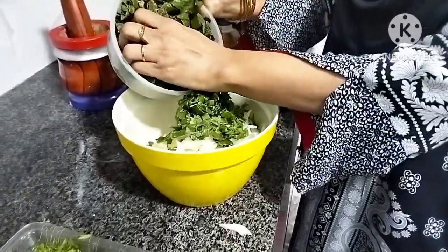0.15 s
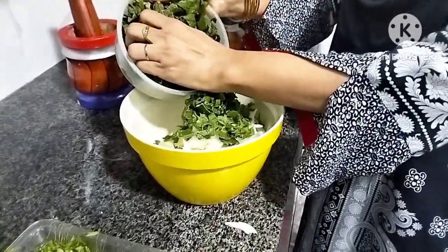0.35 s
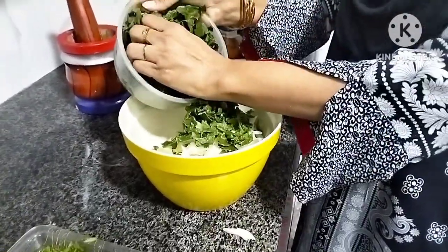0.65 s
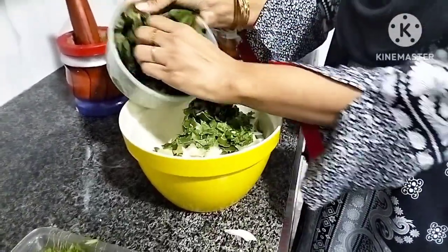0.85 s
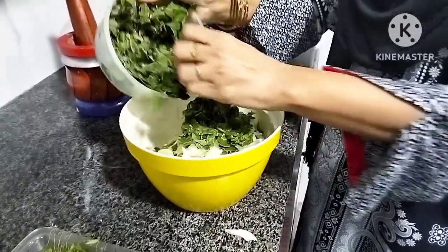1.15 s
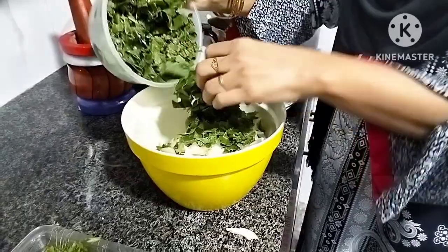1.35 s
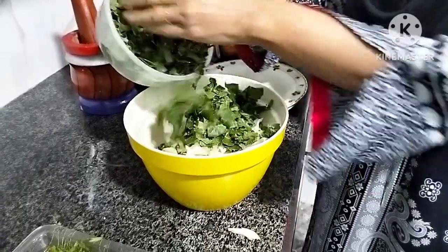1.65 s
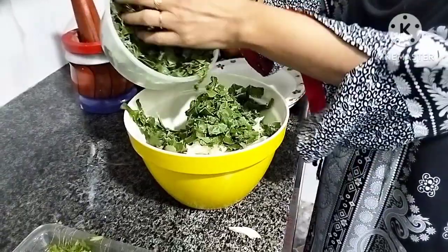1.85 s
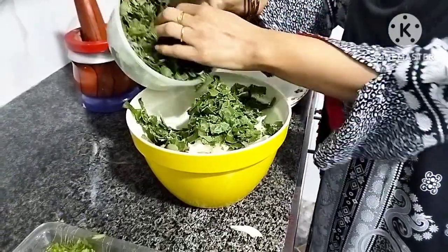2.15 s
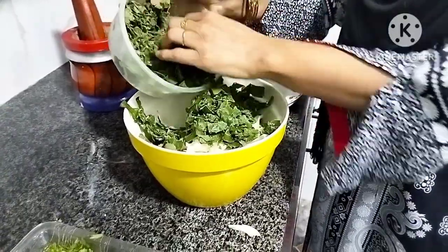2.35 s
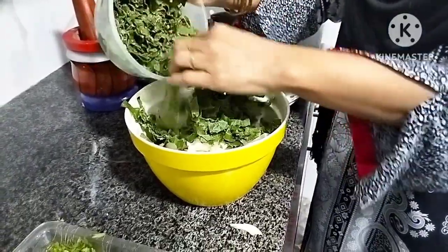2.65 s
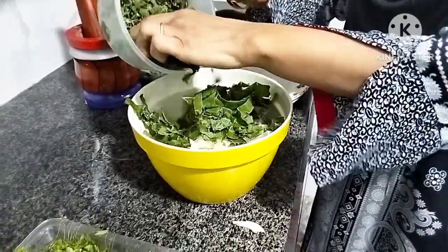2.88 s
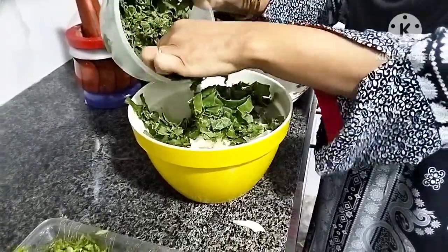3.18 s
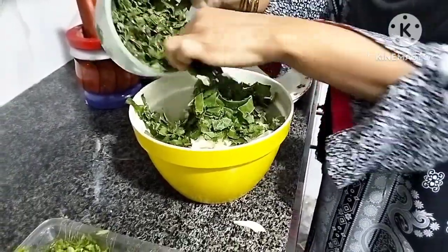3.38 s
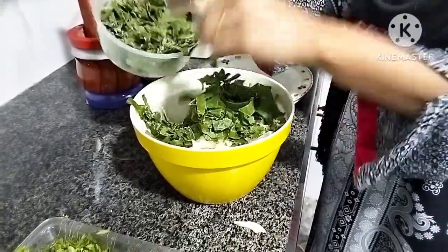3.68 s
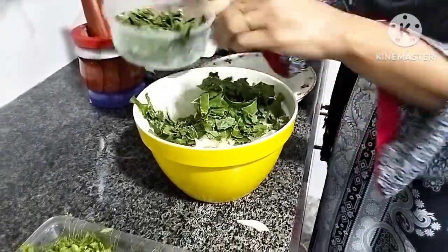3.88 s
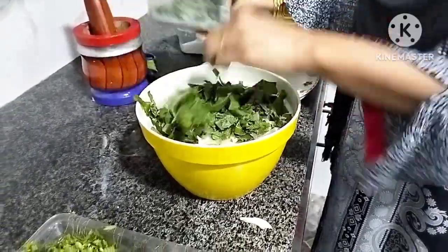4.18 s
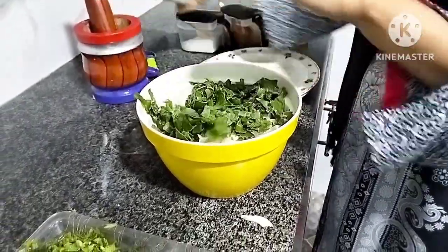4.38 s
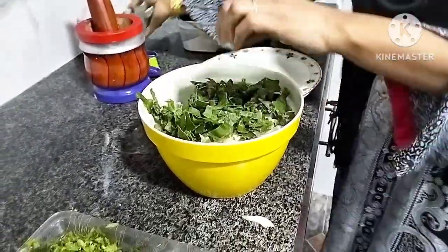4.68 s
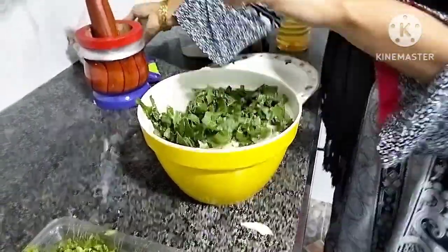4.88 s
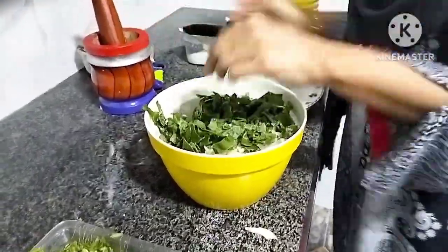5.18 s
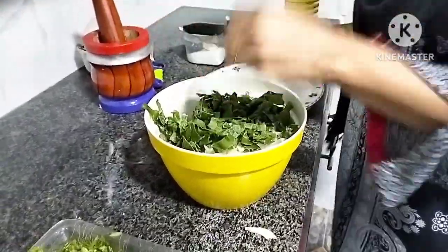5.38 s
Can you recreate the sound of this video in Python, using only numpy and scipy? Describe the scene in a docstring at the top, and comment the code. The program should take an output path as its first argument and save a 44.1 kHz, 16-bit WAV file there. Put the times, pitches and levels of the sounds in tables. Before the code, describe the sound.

A close stereo pickup in a small, reverberant kitchen with a quiet steady room bed. From 0 s, frozen leaves rustle and crackle as fingers rake them from a plastic tub, with dull, hollow bumps at about 0.3-0.7 s, the hardest near 0.68, and more around 1.0-1.3. Bangles give a short clink at 0.8 and a small damped cluster from 1.6 to 1.9. Rustling surges, crisp and bright, at 2.1-2.3 with light tub taps, then continues in strokes at 2.5 and 3.0-3.3 with icy snaps near 2.7-2.9 and a crunch at 3.1. It thins to faint crackles by 3.9. A sleeve brushes softly and unevenly from 4.1 to 5.0, with a barely audible high metallic shimmer near 4.8. The empty tub then hits stone at 4.9, rocks at 4.98 and lands at 5.06-5.1: loud, hollow, clattering knocks. Their ring decays to the end at about 5.7, with another tiny shimmer near 5.3.

```python
"""Raking frozen spinach from a tub

Frozen leaves are raked by hand out of a plastic tub in a hard-walled kitchen: fracture noise follows the strokes.
Clumps crunch as noise bursts; bumps excite the resonances of the leaf-filled tub, and bangles clink as damped metal.
A sleeve brushes past, thin bangles shimmer faintly, and the empty tub is set down on stone in a few quick knocks.
Room decay surrounds the handling and the knocks, over a quiet bed of shaped noise."""
import sys
import numpy as np
from scipy import signal
from scipy.fft import rfft, irfft, next_fast_len
from scipy.io import wavfile
from scipy.ndimage import uniform_filter1d, map_coordinates

SR = 44100
rng = np.random.default_rng(int(sys.argv[2]) if len(sys.argv) > 2 else 0)


def output_pcm(signal):
    """Save a mono or channel-first signal as 16-bit PCM at the path in sys.argv[1].

    Samples are clipped to [-1, 1] before scaling.
    """
    pcm = np.clip(np.atleast_2d(signal).T, -1, 1) * 32767
    wavfile.write(sys.argv[1], SR, np.round(pcm).astype(np.int16))


N = 243766

# fingers and clumps bumping the tub: (time [s], level [dB], hardness as relative tap level [dB])
TUB_BUMPS = [(0.336, -23, -5.5), (0.444, -17.5, -5.5), (0.5, -20, -1.5), (0.675, -10, -2.5),
             (0.712, -19, 0), (0.974, -12, -18), (1.24, -18, -16.5), (1.317, -24.5, -17),
             (1.639, -44, 14.5), (1.686, -44.5, 13.5), (1.878, -38, -12), (2.092, -24, 4.5),
             (2.191, -20, 2.5), (2.235, -19, -7), (3.002, -25.5, -2), (3.27, -34.5, 9.5), (3.318, -30, 7.5),
             (3.723, -45.5, 9), (3.799, -52.5, 15)]
# resonances of the tub damped by leaves: (frequency [Hz], width [Hz], level [dB])
LEAFY_TUB_MODES = [(164.3, 39, -10), (242, 160, -9), (341, 55, -1), (541, 47, 4), (762, 62, -2.5)]
# colour of the frozen leaves: (frequency [Hz], level [dB per Hz])
LEAF_COLOUR = [(410, -56), (700, -39), (808, -10), (922, -33), (1400, -16), (1710, -13.5), (2270, -5.5),
               (2590, -8), (5470, -10), (8210, -22.5), (14000, -17), (15200, -21), (16000, -40)]


def raking():
    """Leaves crackle against each other, catch on the wall of the tub and make its base boom."""
    # resonances of the wall: (frequency [Hz], width [Hz], level [dB])
    wall_modes = [(798, 55, 6), (1030, 110, 0.5), (1380, 330, -1.5)]
    rustle, crisp, scraping, pressing = efforts()

    ticks = amp(-3) * fractures(rate=140, size_db=3, length=0.0009)
    grain = unit(crackle(rate=1300, size_db=-3.5, life=0.0039) + ticks)
    leaves = coloured(grain, LEAF_COLOUR) * amp(wobble(45))
    # the top, split off above 7.5 kHz, follows its own crispness
    top = filtered(leaves, lambda hz: 1 / (1 + (7500 / (hz + 1)) ** 8))

    wall_grain = crackle(rate=390, size_db=-2.5, life=0.0017)
    wall = amp(-4) * unit(resonant(wall_grain, wall_modes))
    base_grain = crackle(rate=400, size_db=-0.5, life=0.0011)
    base = amp(-6.5) * unit(resonant(base_grain, LEAFY_TUB_MODES))

    iciness = amp(1.5 * wobble(20))
    catching = amp(3 * wobble(30))
    bright = crisp * iciness * top * amp(1.5)
    return rustle * (leaves - top) + bright + scraping * catching * wall + pressing * base


def efforts():
    """How strongly the strokes drive rustle, crispness, wall and base; overlapping strokes add in power."""
    # the hand strokes and shakes the leaves: (time of greatest effort [s], rustle level [dB], swell [s],
    # release [s], then relative to the rustle: crispness [dB], scraping the wall [dB], pressing on the base [dB])
    strokes = [(0.019, -38.5, 0.85, 0.26, 0, 0.5, 0.5), (0.17, -39, 0.18, 0.36, 3, -2.5, -4.5),
               (0.52, -40.5, 0.2, 0.76, -0.5, 4, -1.5), (0.69, -34, 0.089, 0.15, 4.5, -14, 4),
               (0.93, -34, 0.093, 0.28, 1, -2, -24), (1.018, -33.5, 0.18, 0.13, -11, -9, -1),
               (1.17, -39.5, 0.18, 0.3, -17, -9, -1.5), (1.30, -40, 0.23, 0.29, -1, -8.5, -2),
               (1.5, -47, 0.37, 0.26, 6, -28, -18), (1.69, -41, 0.18, .3, -1, -17, -34),
               (1.87, -43, 0.24, 0.18, 6, -4, -6), (2.089, -31, .3, 0.1, 1.5, 1, -8),
               (2.238, -27.5, 0.13, 0.15, 1.5, 1, -7), (2.51, -32.5, 0.38, 0.19, -2, 3, -4.5),
               (2.70, -42, 0.074, 0.56, -3.5, -13, -11.5), (3.008, -30, .07, 0.23, -2.5, -5.5, -12),
               (3.124, -33, 0.13, 0.046, -7, 3.5, -7), (3.288, -35, 0.49, 0.35, 0.5, -1.5, -10.5),
               (3.84, -48, 0.29, 0.26, 1.5, -33, -15.5), (4.2, -53, 0.084, 0.25, 9.5, -23, -18)]
    power = 0
    for s, db, rise, fall, *shares in strokes:
        levels = amp(db + np.array([0, *shares]))
        power = power + np.outer(levels, swell(s, rise, fall)) ** 2
    return np.sqrt(power)


def swell(s, rise, fall):
    """A gain that climbs 20 dB in rise seconds to a rounded peak at s and sinks 20 dB in fall seconds."""
    t = np.arange(N) / SR - s
    roundness = 1.11
    return amp(-20 * np.maximum(-t / rise, t / fall) ** roundness)


def crackle(rate, size_db, life):
    """Noise made of tiny fractures, rate a second, of random size; the energy of each fades over life seconds."""
    chance = rng.random(N)
    size = np.minimum(rng.exponential(size=N), 5)
    hits = (chance < rate / SR) * amp(size_db * size) ** 2
    energy = signal.lfilter([1], [1, -np.exp(-1 / (life * SR))], hits)
    return unit(np.sqrt(energy) * noise(N))


def fractures(rate, size_db, length):
    """Single stiff leaves snapping: dry ticks, rate a second, a few much larger than the rest."""
    struck = rng.random(N) < rate / SR
    sizes = struck * amp(size_db * np.minimum(rng.exponential(size=N), 3.5))
    envelope = signal.lfilter([1], [1, -np.exp(-1 / (length * SR))], sizes)
    return unit(envelope * noise(N))


def crunches():
    """A clump, squeezed or jolted by a bump, gives way in a burst of noise, the iciest with a bright snap."""
    # clumps of stiff leaves breaking between the fingers: (time [s], level [dB], relative top-octave snap [dB])
    squeezes = [(0.0922, -24, -10), (0.2205, -26.5, -18), (0.825, -27.5, -21), (1.1533, -24, -26),
                (1.8555, -29.5, 2), (2.6827, -31, 5), (2.6974, -27, -8), (2.842, -32.5, 15),
                (2.9043, -33, 13.5), (3.1222, -22.5, -7), (3.647, -44, 19), (3.8641, -37, -1),
                (4.4882, -35.5, -27)]
    # colour of the snap: (frequency [Hz], level [dB per Hz])
    snap_colour = [(3000, -32), (7000, -36), (11000, 13), (15500, 0)]
    jolt_db, jolt_snap_db = -3.5, 3  # level against the tap of the bump; relative snap
    jolts = [(s, db + hard_db + jolt_db, jolt_snap_db) for s, db, hard_db in TUB_BUMPS]

    out, shape = np.zeros((2, N)), burst(rise=0.0016, t60=0.085)
    for s, db, snap_db in squeezes + jolts:
        body = amp(-2) * coloured(noise(len(shape)), LEAF_COLOUR) * shape
        snap = coloured(noise(len(shape)), snap_colour) * burst(rise=0.00017, t60=0.031)
        add(out, s, amp(db) * (body + amp(snap_db - 13.5) * snap))
    return out


def bumps():
    """Blows boom in the leaf-filled tub and push the air; the harder ones carry more tap of the plastic."""
    # colours of the pushed air and of the tap: (frequency [Hz], level [dB per Hz])
    push_colour = [(30, -33), (60, -34), (95, -9), (130, 5.5), (200, -9), (270, -9), (400, 10.5),
                   (800, -21)]
    tap_colour = [(120, -25), (300, -14), (550, -7), (800, 9.5), (1030, 7), (1300, 5.5), (1600, -4),
                  (2100, 5), (4000, -41)]
    out, shape = np.zeros((2, N)), burst(rise=0.0013, t60=0.05)
    for s, db, hard_db in TUB_BUMPS:
        boom = peaked(resonant(noise(len(shape)) * shape, LEAFY_TUB_MODES))
        push = coloured(noise(len(shape)), push_colour) * burst(rise=0.0013, t60=0.051)
        tap = coloured(noise(len(shape)), tap_colour) * burst(rise=0.0013, t60=0.048)
        add(out, s, amp(db) * (amp(-7) * boom + amp(-15) * push + amp(hard_db - 2) * tap))
    return out


def bangles():
    """Bangles chatter briefly against each other, damped by the wrist."""
    # bangles touching: (time [s], level [dB], length of the chatter as t60 [s])
    clinks = [(0.824, -15, 0.023), (1.609, -17, 0.11), (1.685, -22.5, 0.031), (1.784, -19.5, 0.047),
              (1.803, -20, 0.048), (1.8202, -15, 0.044), (1.854, -17.5, 0.12), (1.879, -21, 0.03)]
    # resonances of a bangle: (frequency [Hz], width [Hz], level [dB])
    bangle_modes = [(2796, 95, 1), (3160, 670, -8), (3820, 250, 2.5), (4590, 570, -3.5),
                    (5700, 2300, -14.5)]
    out = np.zeros((2, N))
    for s, db, t60 in clinks:
        shape = burst(rise=0.00017, t60=t60)
        contact = noise(len(shape)) * shape
        add(out, s, amp(db) * (peaked(resonant(contact, bangle_modes)) + amp(-19) * contact))
    return out


def jingles():
    """Loose thin bangles sliding on the wrist shiver with a faint, very high shimmer."""
    # shivers: (time [s], level [dB])
    shivers = [(4.787, -37), (5.312, -42), (5.36, -34)]
    # resonances of the thin metal: (frequency [Hz], width [Hz], level [dB])
    thin_modes = [(10700, 260, 1), (12400, 200, -1), (13100, 450, 0), (14500, 400, -5), (15320, 300, 2)]
    out, shape = np.zeros((2, N)), burst(rise=0.0022, t60=0.23)
    for s, db in shivers:
        add(out, s, amp(db) * peaked(resonant(noise(len(shape)) * shape, thin_modes)))
    return out


def sleeve():
    """Cloth brushes softly and unevenly, in one long stroke, as the arm reaches over the counter."""
    # colour of the cloth: (frequency [Hz], level [dB per Hz])
    cloth_colour = [(500, -18.5), (1200, -13.5), (1650, -6.5), (2100, -0.5), (2600, -6), (3500, -5.5),
                    (5500, -8), (8300, -22), (12000, -14), (15500, -22)]
    start_s, attack_s, release_start_s, release_s = 4.14, 0.061, 4.627, 0.46
    t = np.arange(N) / SR
    attack = np.clip((t - start_s) / attack_s, 0, 1)
    release = np.clip(1 - (t - release_start_s) / release_s, 0, 1)
    fibres = crackle(rate=2500, size_db=3.5, life=0.0024)
    folds = amp(1.3 * wobble(22))
    return attack * release * folds * amp(-50.5) * coloured(fibres, cloth_colour)


def set_down():
    """One edge of the tub strikes the stone, it rocks, then the base lands and settles; the room rings on."""
    # the tub meeting the counter: (time [s], hollow blow [dB], crack [dB], thud [dB], base clatter [dB],
    # relative room [dB])
    knocks = [(4.8859, -6, -11, -29, -24, 2.5), (4.9763, -9, -25, -24.5, -15, -7),
              (5.057, -24.5, -22.5, -11, -36, -1.5), (5.065, -3, -19, -17, -10, -4.5),
              (5.078, -25, -24.5, -19.5, -12, -0.5), (5.111, -23, -29, -16, -17.5, -4)]
    # resonances of the empty tub and of its base: (frequency [Hz], width [Hz], level [dB])
    empty_modes = [(513, 142, -12.5), (786, 130, -4), (890, 160, -2), (1053, 117, -1.5)]
    base_modes = [(1465, 280, -0.5), (1730, 300, -0.5), (2010, 280, -8), (2710, 270, -13.5)]
    # colours of crack and thud: (frequency [Hz], level [dB per Hz])
    crack_colour = [(500, -20), (1300, -8), (2000, -1), (3300, -1), (4500, -6.5), (6500, -13.5),
                    (9000, -26.5), (12500, -21), (16000, -32)]
    thud_colour = [(30, -48), (70, -9), (110, -41), (170, -5), (260, -1.5), (350, 0.5), (600, -0.5),
                   (1200, -30.5)]
    # the notes that the knocks leave ringing: (frequency [Hz], relative level [dB])
    ring_notes = [(262, -18), (337, -17), (537, -16), (592, -2), (855, 6), (899, 5), (965, -10),
                  (1033, -10), (1157, 1), (1465, -10), (1533, -13), (1647, -4), (1767, 1)]

    out, t = np.zeros((2, N)), np.arange(SR) / SR
    for s, db, crack_db, thud_db, clatter_db, room_db in knocks:
        pulse = np.diff(burst(rise=0.00003, t60=0.0025), prepend=0)  # a short contact
        count = len(pulse)
        hollow = amp(db) * peaked(resonant(pulse, empty_modes))
        crack = amp(crack_db - 4) * coloured(noise(count), crack_colour) * burst(rise=0.00045, t60=0.034)
        thud = amp(thud_db - 5) * coloured(noise(count), thud_colour) * burst(rise=0.0022, t60=0.042)
        rattle = noise(count) * burst(rise=0.0011, t60=0.024)
        clatter = amp(clatter_db) * peaked(resonant(rattle, base_modes))

        # lengthened to one second to leave space for the room
        padding = ((0, 0), (0, 0), (0, SR - count))
        plastic, contact = np.pad([hollow + clatter, crack + thud], padding)
        room = kitchen(plastic) + wash(crack, crack_colour) + wash(thud, thud_colour)

        ring = np.zeros((2, SR))
        for hz, level in ring_notes:
            ear_phase = rng.normal(0, 0.52, (2, 1))  # left and right differ a little [rad]
            ring += amp(level) * np.sin(2 * np.pi * (hz * t + rng.random()) + ear_phase)
        ring = unit(ring) * (1 - np.exp(-t / 0.0032)) * np.exp(-np.log(1000) * t / 0.84)
        add(out, s, plastic + contact + amp(room_db) * (amp(4) * room + amp(db - 21.5) * ring))

    # the knocks carry no deep bass
    highpass = signal.butter(2, 85, "highpass", fs=SR, output="sos")
    return signal.sosfilt(highpass, out)


def kitchen(x):
    """Close tiled walls answer at once; then each frequency of the room dies at its own speed."""
    # decay of the room: (frequency [Hz], t60 [s])
    room_t60 = [(100, 0.063), (400, 0.83), (1200, 0.68), (4000, 0.89), (8000, 0.53), (15000, 0.37)]
    hz, t, z = signal.stft(noise(SR), SR, nperseg=256)
    near_walls = 1 + amp(-2.5) * np.exp(-t / 0.023)
    decay = np.exp(-np.log(1000) * t / along(room_t60, hz)[:, None])
    onset = 1 - np.exp(-t / 0.0031)
    tail = signal.istft(z * decay * onset * near_walls, SR, nperseg=256)[1]
    return signal.fftconvolve(x, tail / np.linalg.norm(tail[0]), axes=1)[:, :x.shape[-1]]


def wash(sound, spectrum):
    """The kitchen's smooth answer to a short sound: its energy and given spectrum, spread over the decay."""
    tail = coloured(kitchen(signal.unit_impulse(SR)[None]), spectrum)
    return tail * np.linalg.norm(sound) / np.linalg.norm(tail)


def background():
    """The quiet of the room: steady noise with a fixed spectrum."""
    # colour of the quiet: (frequency [Hz], level [dB per Hz])
    quiet_colour = [(15, -61), (25, -12), (74, -10.5), (134, -7.5), (212, -11), (309, -12.5), (373, -23.5),
                    (439, -12), (714, -21), (796, -2.5), (1040, -40), (2000, -19), (5430, -15.5),
                    (9840, -25), (16000, -16)]
    return amp(-57.5) * coloured(noise(N), quiet_colour)


def patchy(x, depth_db):
    """Uneven colour, as from clump to clump: random gains over short stretches and bands."""
    z = signal.stft(x, nperseg=256)[2]
    field = rng.standard_normal(z.shape[1:])
    field = uniform_filter1d(field, size=9, axis=0)  # across frequency
    field = uniform_filter1d(field, size=6, axis=1)  # across time
    return signal.istft(z * amp(depth_db * unit(field)), nperseg=256)[1][:, :N]


def resonant(x, modes):
    """x through (Hz, width, dB) resonances, added with alternating sign."""
    def response(f):
        total = 0
        for k, (c, w, db) in enumerate(modes):
            total = total + (-1) ** k * amp(db) * 1j * f * w / (c * c - f * f + 1j * f * w)
        return total
    return filtered(x, response)


def coloured(x, spectrum):
    """x filtered by a (Hz, dB) spectrum, at rms 1."""
    return unit(filtered(x, lambda hz: amp(along(spectrum, hz))))


def filtered(x, response):
    """x times a complex response of frequency."""
    m = next_fast_len(x.shape[-1] + SR // 4)
    return irfft(rfft(x, m) * response(np.fft.rfftfreq(m, 1 / SR)), m)[..., :x.shape[-1]]


def noise(count):
    """Stereo white noise."""
    return spread(rng.standard_normal((2, count)))


def spread(pair):
    """Two unrelated signals become left and right, with a likeness that depends on frequency."""
    # (frequency [Hz], left-right likeness [0 to 1])
    likeness = [(60, 0.21), (130, 0.73), (300, 1), (640, 0.6), (1200, 0.62), (3000, 0.11)]
    turn = lambda hz: np.arccos(np.clip(along(likeness, hz), -1, 1)) / 2
    mid, side = filtered(pair, lambda hz: np.array([np.cos(turn(hz)), np.sin(turn(hz))]))
    return np.array([mid + side, mid - side])


def wobble(rate):
    """A smooth random curve, rate knots a second."""
    knots = rng.standard_normal(int(N * rate / SR) + 4)
    return map_coordinates(knots, [np.arange(N) * rate / SR])


def burst(rise, t60):
    """The envelope of one contact, a quarter of a second long."""
    t = np.arange(SR // 4) / SR
    return (1 - np.exp(-t / rise)) * np.exp(-np.log(1000) * t / t60)


def add(track, s, sound):
    """Mix a sound into the track at s seconds."""
    part = track[:, max(round(s * SR), 0):][:, :sound.shape[-1]]
    part += sound[..., :part.shape[-1]]


def amp(db):
    """Decibels to gain."""
    return 10 ** (np.asarray(db) / 20)


def unit(x):
    """Scale to rms 1."""
    return x / np.sqrt(np.mean(x ** 2) + 1e-20)


def peaked(x):
    """Scale to peak 1."""
    return x / abs(x).max()


def along(points, hz):
    """(Hz, value) points read on a log axis."""
    f, v = np.transpose(points)
    return np.interp(np.log(hz + 1), np.log(f + 1), v)


def scene():
    """The handling sounds and the knocks, all in the same kitchen, over its quiet."""
    rubbing = patchy(raking() + crunches() + sleeve(), depth_db=1)
    tub = bumps()
    wrist = bangles() + jingles()
    room = kitchen(amp(-6) * rubbing + amp(-1.5) * tub + amp(-5) * wrist)
    return rubbing + tub + wrist + room + set_down() + background()


def record(dry):
    """The two microphone ports differ in colour and arrival time; nothing is kept above the band limit."""
    # (frequency [Hz], left minus right [dB])
    port_balance = [(60, 1), (87, 4), (130, 1.5), (180, 3), (260, -0.5), (380, -0.5), (550, -2.5),
                    (790, 2.5), (1140, -1.0), (1650, -3.5), (2380, -3.5), (3440, -6), (4970, -5.5),
                    (7180, -7), (10400, 5.5), (15000, -6)]
    band_limit_hz = 15800
    left_lead_s = 0.00017  # the sound reaches the left port first

    def ports(hz):
        gain = amp(np.outer([0.5, -0.5], along(port_balance, hz)))
        shift = np.exp(1j * np.pi * np.outer([1, -1], hz) * left_lead_s)
        return gain * shift * (hz < band_limit_hz)
    return filtered(dry, ports)


dry = scene()
out = record(dry)
output_pcm(out)
```